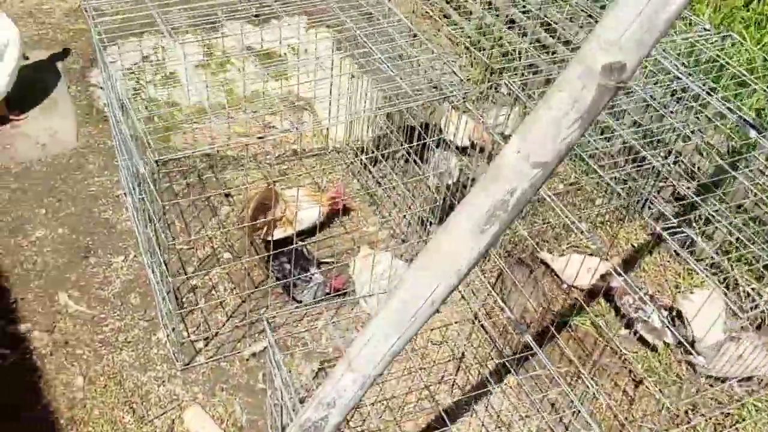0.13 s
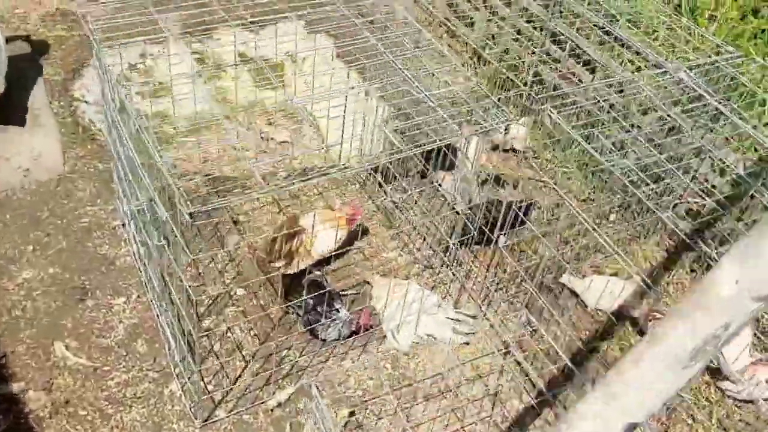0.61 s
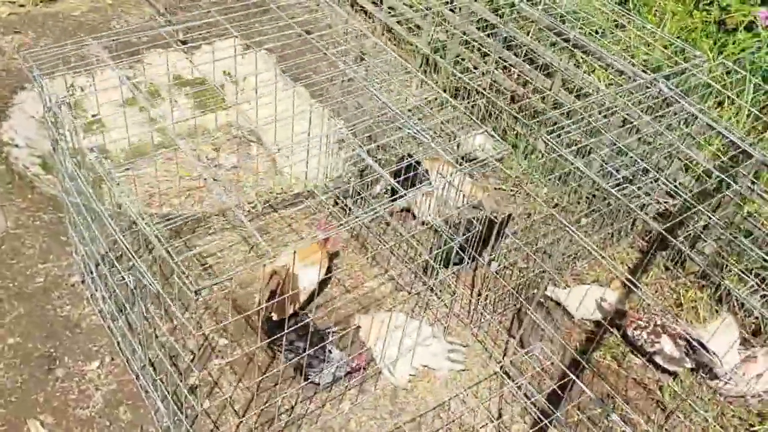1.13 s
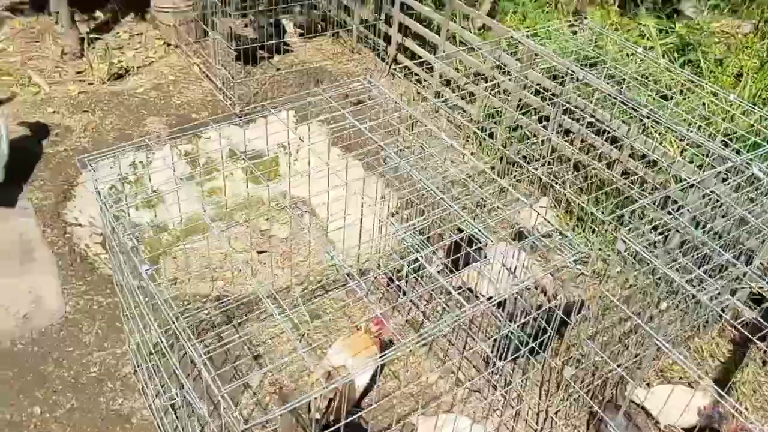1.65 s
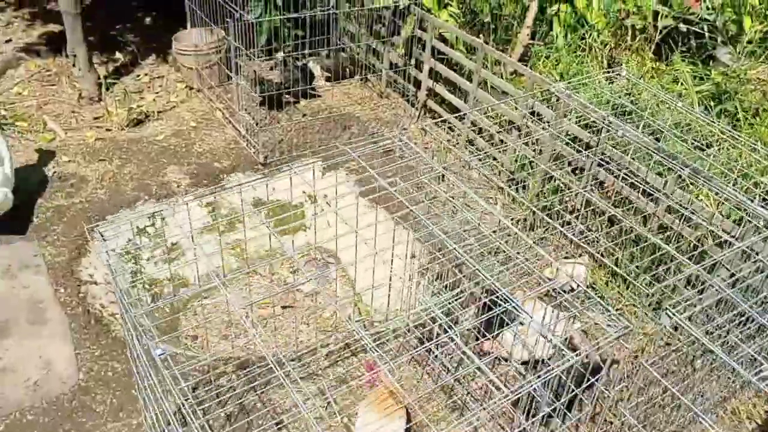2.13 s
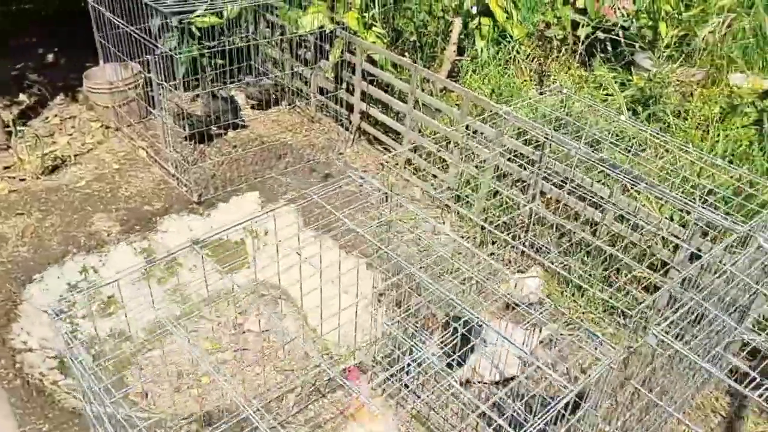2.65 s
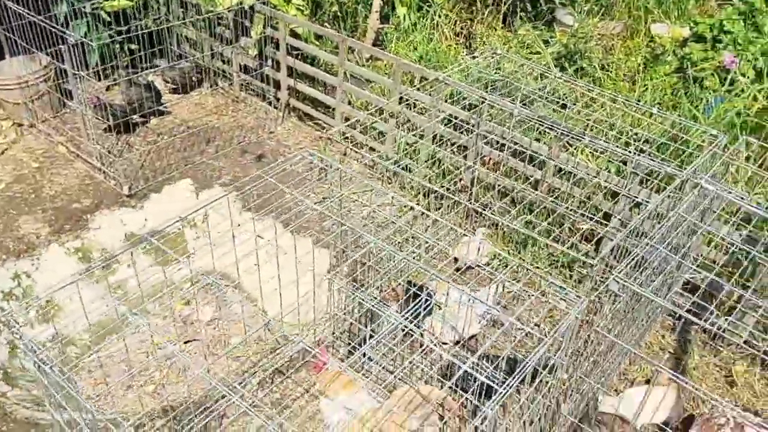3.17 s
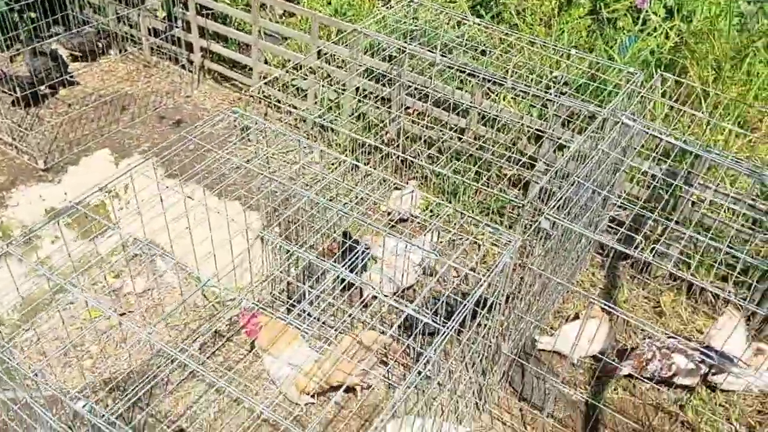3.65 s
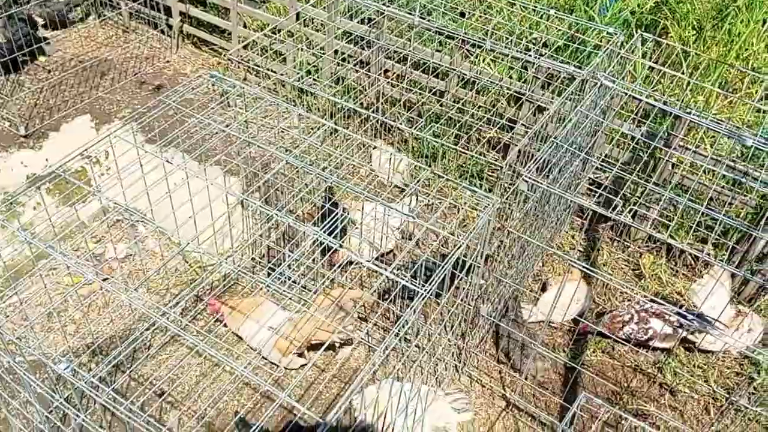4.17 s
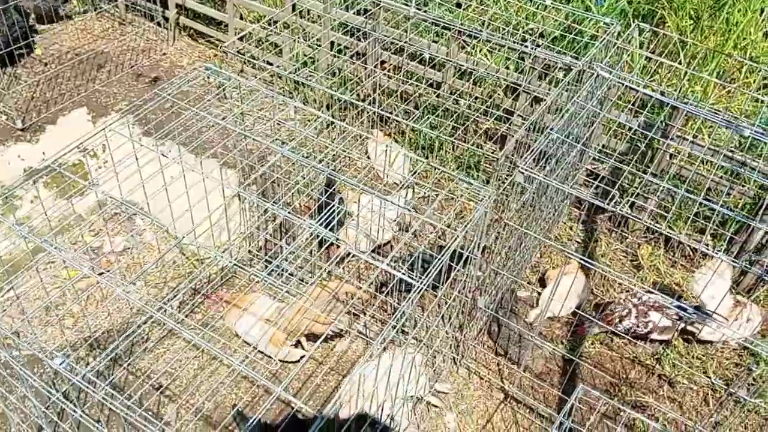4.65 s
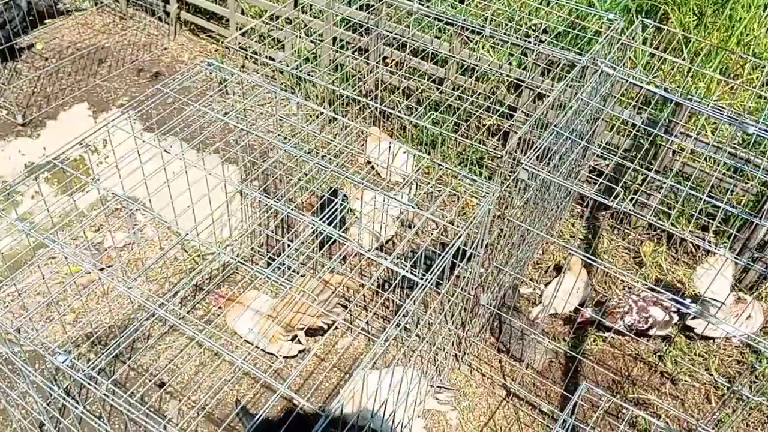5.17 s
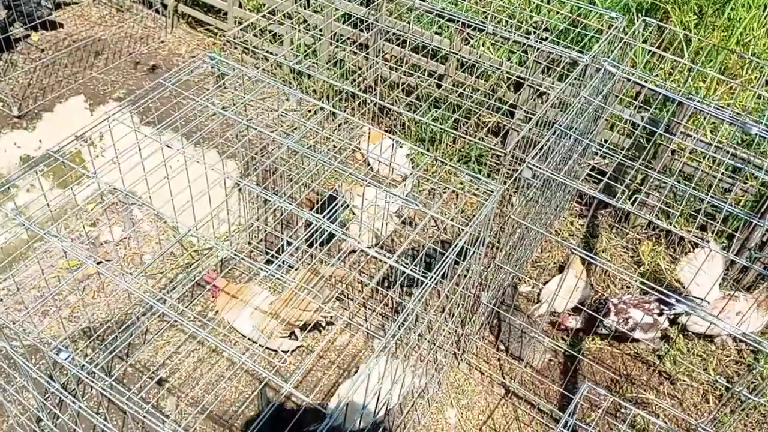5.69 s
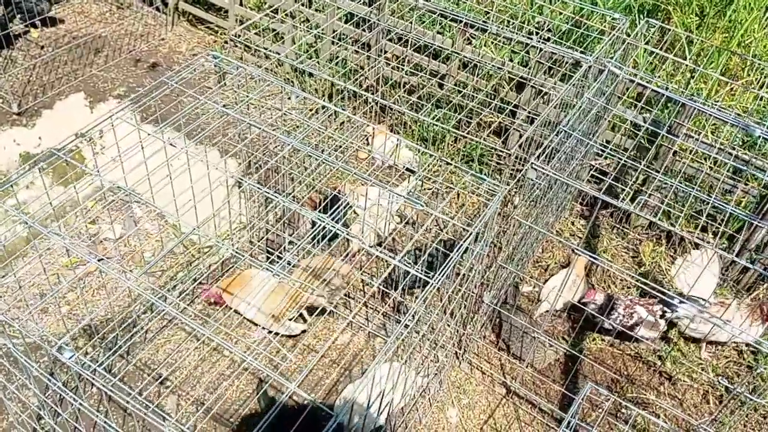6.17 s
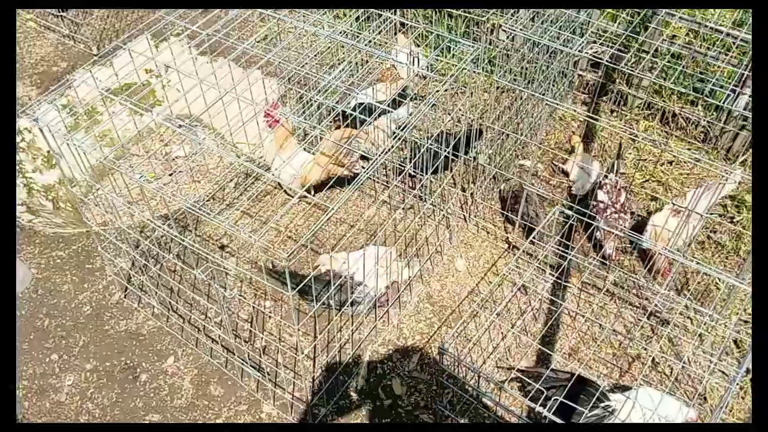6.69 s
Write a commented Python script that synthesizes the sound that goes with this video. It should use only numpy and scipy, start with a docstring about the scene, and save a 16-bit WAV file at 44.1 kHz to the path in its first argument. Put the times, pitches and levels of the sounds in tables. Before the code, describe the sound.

Loud raspy duck quacks repeat in a sunny farmyard, with small peeps and low engine drone behind, then cut off before background fades back.

```python
"""Traffic rumbles far off with droning engines; a near duck then gives a run of long hoarse quacks. Other ducks
put in mostly short ones, one long, and chicks peep. Noise of set spectrum makes road and wind, sinusoids make
engines and peeps, and uneven pulses with breath noise, shaped by resonances, make quacks. Two spaced microphone
ports of a phone hear it; near the end the sound is cut off and fades back in."""
import sys
import numpy as np
from scipy import signal
from scipy.fft import rfft, irfft, next_fast_len
from scipy.io import wavfile
from scipy.ndimage import uniform_filter1d, map_coordinates

SR = 44100
rng = np.random.default_rng(int(sys.argv[2]) if len(sys.argv) > 2 else 0)


def wav_out(sig):
    """Save sig, one row per channel (or a flat mono array), as 16-bit PCM at SR to the path in sys.argv[1]."""
    wavfile.write(sys.argv[1], SR, np.round(np.clip(np.atleast_2d(sig).T, -1, 1) * 32767).astype(np.int16))


def field_ratio(decibels):
    """Amplitude ratio for a level in dB (20 dB per decade); scalars and array-likes work."""
    return 10 ** (np.asarray(decibels, dtype=float) / 20)


N = 300762


def unit(x):
    """Normalisation: scales a signal to rms 1."""
    return x / np.sqrt(np.mean(x ** 2) + 1e-20)


def along(points, hz):
    """Logarithmic frequency scale: reads (f/Hz, value) points along it."""
    f, v = np.transpose(points)
    return np.interp(np.log(hz + 1), np.log(f + 1), v)


def curves(rows, t):
    """Linear interpolation in time: reads every column after the first at times t."""
    s, *cols = np.transpose(rows)
    return [np.interp(t, s, c) for c in cols]


def wobble(rate, n=N):
    """Band-limited fluctuation: a smooth random curve with rate knots a second."""
    return map_coordinates(rng.standard_normal(int(n * rate / SR) + 4), [np.arange(n) * rate / SR])


def filtered(x, response):
    """Linear filtering: multiplies the spectrum by a complex response of frequency."""
    n = x.shape[-1]
    m = next_fast_len(n + 8192)
    return irfft(rfft(x, m) * response(np.fft.rfftfreq(m, 1 / SR)), m)[..., :n]


def resonances(modes):
    """Modal superposition: second-order resonances (f/Hz, width/Hz, level/dB) of alternating sign."""
    return lambda f: sum((-1) ** k * field_ratio(db) * 1j * f * w / (c * c - f * f + 1j * f * w)
                         for k, (c, w, db) in enumerate(modes))


def rolloff(corner_hz, q):
    """Sixth-order low-pass: three equal second-order sections."""
    return lambda f: 1 / (1 + (1j * f / corner_hz) / q - (f / corner_hz) ** 2) ** 3


# correlation of the background between the ports: f/Hz, left-right likeness/1
ALIKE = [(60, 0.94), (300, 1), (700, 0.28), (1500, 0.88), (2500, 0.052), (6000, 0.12)]


def rush(spectrum, patchy_db):
    """Partly coherent noise: stereo of rms 1 with random gain patches in time and frequency."""
    z = signal.stft(rng.standard_normal((2, N)), nperseg=512)[2]
    field = uniform_filter1d(rng.standard_normal(z.shape[1:]), size=5, axis=0)
    field = uniform_filter1d(field, size=10, axis=1)
    pair = signal.istft(z * field_ratio(patchy_db * unit(field)), nperseg=512)[1][:, :N]

    def shaped(hz):
        # cos of twice this angle is the correlation of mid + side with mid - side
        turn = np.arccos(np.clip(along(ALIKE, hz), -1, 1)) / 2
        return field_ratio(along(spectrum, hz)) * [np.cos(turn), np.sin(turn)]

    mid, side = filtered(pair, shaped)
    return unit(np.array([mid + side, mid - side]))


# low drones that swell and glide, as of passing vehicles: t/s, length/s, first f/Hz, last f/Hz, level/dB
DRONE = [(-.1, 0.48, 96.7, 105, -29.5), (0.7, 0.81, 120.8, 117.5, -33.5), (1.557, 0.73, 104, 100.1, -29),
         (2.287, 0.74, 98.5, 94.8, -29), (1.888, 2.0, 193.6, 161.6, -34), (2.918, 0.83, 123.8, 110.5, -23),
         (5.75, 0.47, 129.3, 126.3, -26.5)]
# an engine that draws near and speeds up: t/s, f/Hz, level/dB
ENGINE = [(3.6, 77.74, -60), (3.9, 81.33, -31.5), (4.7, 86, -34), (5.4, 86.52, -34), (5.7, 86.7, -37),
          (5.95, 88.18, -29.5), (6.35, 88.4, -41), (6.5, 88.5, -43.5)]
# its orders: multiple of f/1, relative level/dB
ENGINE_ORDERS = [(1, -0.5), (2, -10.5), (3, -2), (4, -13.5)]
# harmonics of a small motor of steady pitch: multiple of HUM_HZ/1, relative level/dB
HUM = [(4, -52.5), (6, -56), (8, -52)]
# course of the hum, added to its harmonics: t/s, relative level/dB
HUM_LEVEL = [(0, 7), (.5, 3.5), (.8, -1), (1.4, 2), (1.7, 11), (2.1, 3), (4, 2.5), (6.3, -10.5), (6.6, 10)]
HUM_HZ = 87.2


def engines(t):
    """Periodic excitation: rotating machines radiate sinusoids at multiples of their rate."""
    out, waver = 0, 1 + .03 * wobble(20)
    for s, length, first_hz, last_hz, db in DRONE:
        u = np.clip((t - s) / length, 0, 1)
        hz = (first_hz + (last_hz - first_hz) * u) * waver
        swell = field_ratio(db + 1.3 * wobble(22)) * np.sin(np.pi * u)
        out = out + swell * np.sin(2 * np.pi * np.cumsum(hz) / SR)
    hz, db = curves(ENGINE, t)
    turn = 2 * np.pi * np.cumsum(hz * (1 + 0.014 * wobble(8))) / SR
    out = out + sum(field_ratio(db + g + 4.3 * wobble(7.3)) * np.sin(k * turn) for k, g in ENGINE_ORDERS)
    turn = 2 * np.pi * np.cumsum(HUM_HZ * (1 + 0.00595 * wobble(6))) / SR
    hum_db, = curves(HUM_LEVEL, t)
    return out + sum(field_ratio(g + hum_db + 2.2 * wobble(7.4)) * np.sin(k * turn) for k, g in HUM)


# spectral shapes of the noises: f/Hz, relative level per Hz/dB
RUMBLE = [(12, -68.5), (20, -35.5), (54, -18), (67, -6.5), (92, -0.5), (208, -5), (230, -12.5), (258, -10),
          (400, -23), (520, -44.5), (880, -120)]
ROAR = [(120, -23), (200, -5), (232, -3.5), (265, -4), (518, -7.5), (703, -9), (1310, -9.5), (3000, -25),
        (3900, -71.5), (6600, -120)]
HISS = [(1290, -29), (2200, -8.5), (3280, -12), (3680, -11), (5000, -17), (5530, -18.5), (6210, -19.5),
        (6640, -26.5), (6800, -28.5), (8100, -24.5), (13600, -30.5), (15000, -37.5), (16000, -37)]
# course of the traffic: t/s, level/dB
TRAFFIC = [(0, -36), (.65, -35), (1.9, -33), (2.9, -36), (3.6, -33.5), (4.1, -32.5), (5.1, -32),
           (5.75, -33.5), (6.05, -32.5), (6.35, -35), (6.5, -34.5), (6.82, -35.5)]
# course of the wind hiss: t/s, level/dB
WIND = [(0, -56.5), (.6, -50), (3, -50.5), (4.3, -46.5), (5.7, -46.5), (6.35, -46), (6.5, -55.5),
        (6.82, -56)]
RUMBLE_DB = 2  # over the traffic course
ROAR_AFTER_DB = -1.5  # the roar is weaker after the cut
SWISH_S, SWISH_RISE_S, SWISH_FALL_S, SWISH_DB = 1.85, .012, .035, -37  # a thin high swish
CUT_S, RETURN_S, FADE_S = 6.357, 6.467, .4


def yard():
    """Broadband turbulence and friction: traffic rumble and roar, wind hiss in the leaves, a swish, engines."""
    t = np.arange(N) / SR
    (road_db,), (hiss_db,) = curves(TRAFFIC, t), curves(WIND, t)
    rumble_db = road_db + RUMBLE_DB + 2.0 * wobble(4.9) + 0.3 * wobble(5.3)
    out = field_ratio(rumble_db) * rush(RUMBLE, patchy_db=0.72)
    roar_db = road_db + ROAR_AFTER_DB * (t > RETURN_S) + 0.7 * wobble(8.7)
    out += field_ratio(roar_db) * rush(ROAR, patchy_db=2.0)
    out += field_ratio(hiss_db + 0.61 * wobble(3.424)) * rush(HISS, patchy_db=1.5)
    swish = np.exp(-np.abs(t - SWISH_S) / np.where(t < SWISH_S, SWISH_RISE_S, SWISH_FALL_S))
    thin = [(8000, -29), (11000, -5), (14000, -18), (15300, 7), (16000, -39.5)]
    out += field_ratio(SWISH_DB) * swish * rush(thin, patchy_db=1.5)
    return out + engines(t)


# whistles: t/s, length/s, highest f/Hz, level/dB, left-right level/dB
# chick peeps that slide down
PEEPS = [(3.12, .03, 3560, -48, -9), (3.238, .055, 4350, -45, -8), (3.367, .045, 5100, -48, 2),
         (3.372, .055, 4480, -44, -8), (3.532, .055, 4760, -43, -5), (3.54, .05, 5360, -48, 6),
         (4.655, .055, 4650, -46, -3), (4.905, .045, 5150, -47, -3), (4.899, .055, 4650, -47, -3),
         (6.105, .07, 5300, -53, -5), (6.69, .04, 4080, -43, 4)]
# peeps that arch up and down
ARCHES = [(6.13, 0.066, 3220, -46, -4.5), (6.529, 0.052, 4070, -45, 5.5), (6.54, 0.028, 4450, -48, -11),
          (6.622, 0.051, 3050, -50.5, -1), (6.668, 0.046, 4580, -50, -11), (6.79, 0.036, 4700, -55, -12)]
# nearly level notes, of chicks and of far fowl
NOTES = [(3.226, 0.03, 5150, -42, -12), (3.474, 0.0253, 5160, -41.5, -20), (3.2, 0.23, 1296, -45.5, -12),
         (3.44, 0.18, 1031, -43, 2), (3.44, 0.13, 700, -39, 2), (6.52, 0.025, 1940, -54, 0),
         (6.63, 0.026, 6050, -69, 8), (6.8, .03, 3200, -51, 0)]
# (rise, fall as shares of the highest pitch, place of the top 0-1)
PEEP_BEND, ARCH_BEND, NOTE_BEND = (.03, .24, .15), (.3, .28, .4), (.012, .012, .2)


def chicks():
    """Frequency modulation: each whistle rises to a top and falls, with a faint second harmonic."""
    out = np.zeros((2, N + SR))
    kinds = ((PEEPS, PEEP_BEND), (ARCHES, ARCH_BEND), (NOTES, NOTE_BEND))
    whistles = [(*row, *bend) for rows, bend in kinds for row in rows]
    for s, length, top_hz, db, pan_db, rise, fall, top in whistles:
        u = np.linspace(0, 1, round(length * SR))
        rising = 1 - rise * np.abs(1 - u / top) ** 3
        falling = 1 - fall * np.abs((u - top) / (1 - top)) ** 1.2
        hz = top_hz * np.where(u < top, rising, falling)
        turn = 2 * np.pi * np.cumsum(hz * (1 + .008 * wobble(200, len(u)))) / SR
        swell = np.sin(np.pi * u ** .6) ** .7 * field_ratio(db + 4 * wobble(130, len(u)))
        whistle = swell * (np.sin(turn) + 0.015 * np.sin(2 * turn))
        start = round(s * SR)
        out[:, start:start + len(u)] += field_ratio([[pan_db / 2], [-pan_db / 2]]) * whistle
    return out[:, :N]


LONG_S = .15  # longer quacks count as long
LONG_DB, SHORT_DB = (-.5, -1.5), (-1, -4.5)  # (onset, last moment before the release) under the top
LONG_TOP, SHORT_TOP = .55, .25  # place of the top in the quack, 0-1
LONG_RELEASE_S, SHORT_RELEASE_S, RELEASE_DB = .036, .02, -22.5
ATTACK_S, SHORT_ATTACK_S, ATTACK_DB = .002, .002, -3


def effort(s, length, db):
    """Amplitude envelope as (t/s, level/dB): sudden attack, swell, sag, release; short ones peak early."""
    if length > LONG_S:
        (onset_db, late_db), top, attack_s, release_s = LONG_DB, LONG_TOP, ATTACK_S, LONG_RELEASE_S
    else:
        (onset_db, late_db), top, attack_s, release_s = SHORT_DB, SHORT_TOP, SHORT_ATTACK_S, SHORT_RELEASE_S
    return [(s, db + onset_db + ATTACK_DB), (s + attack_s, db + onset_db), (s + top * length, db),
            (s + length - release_s, db + late_db), (s + length, db + RELEASE_DB)]


def syrinx(cycles, weaker, hoarse):
    """Period doubling: pulses alternate strong and weak, and breath noise bursts once a cycle."""
    n = len(cycles)
    count = np.arange(.1, cycles[-1])
    chance = rng.standard_normal((len(count), 2))
    uneven = np.interp(count, cycles, hoarse)
    # the alternation comes and goes
    alternation = weaker * np.clip(1 + .25 * wobble(12, n), 0, 1.25)
    weak = np.floor(count) % 2 * np.interp(count, cycles, alternation)
    # weak pulses also come late
    at = np.interp(count + .1 * weak + .05 * uneven * chance[:, 0], cycles, np.arange(n))
    size = (1 - weak) * field_ratio(10 * uneven * chance[:, 1])
    # a windowed sinc sets each pulse between samples
    taps = np.floor(at)[:, None] + np.arange(-7, 9)
    gap = taps - at[:, None]
    shape = size[:, None] * np.sinc(gap) * np.cos(gap * np.pi / 16) ** 2
    pulses = np.bincount(np.clip(taps, 0, n - 1).astype(int).ravel(), shape.ravel(), n)
    # the membranes flutter, so random phases spread each pulse over some ms
    flutter = .75 * rng.standard_normal(60)
    pulses = filtered(np.roll(pulses, -150), lambda f: np.exp(
        1j * np.interp(f / 230, np.arange(60), flutter) - 2j * np.pi * f * 150 / SR))
    burst = np.exp(-1.5 * ((cycles - .1) % 1)) * (1 - 0.17 * weaker * (np.floor(cycles) % 2))
    breath = burst * rng.standard_normal(n)
    return np.sqrt(1 - hoarse) * unit(pulses) + np.sqrt(hoarse) * unit(breath), breath


# lower throat, which moves: multiple of the first resonance/1, width/Hz, level/dB
THROAT = [(.56, 220, -15), (.78, 170, -9), (1.0, 130, 1.5)]
# upper throat, which follows its mean: multiple of the first resonance/1, width/Hz, level/dB
UPPER = [(1.37, 148.5, -5), (1.65, 182.6, -6.5)]
# resonances of the bill that stay put: f/Hz, width/Hz, level/dB
BILL = [(3070, 385, -20), (4145, 520, -23.5), (4920, 240, -29), (5556, 300, -23), (6240, 120, -32.5),
        (7400, 120, -41.5), (7900, 270, -29.5)]
WANDER_DB = 1.8  # the bill never holds still


def vocal_tract(source, breath, shut_hz, wide_hz, opening_db, treble_db):
    """Source-filter principle: throat resonances that shift and fixed bill resonances colour the source."""
    n = len(source)
    u = np.linspace(0, 1, n)
    shut, wide = [filtered(source, resonances([(k * f, w, g) for k, w, g in THROAT]))
                  for f in (shut_hz, wide_hz)]
    mean_hz = (shut_hz + wide_hz) / 2
    upper = sum((-1) ** k * field_ratio(WANDER_DB * wobble(21.9, n))
                * filtered(source, resonances([(ratio * mean_hz, w, g)]))
                for k, (ratio, w, g) in enumerate(UPPER))
    throat = field_ratio(WANDER_DB / 2 * wobble(15, n)) * ((1 - u) * shut + u * wide) + field_ratio(opening_db) * upper
    throat = filtered(throat, rolloff(2450, 1.041))
    breathy = source + .15 * unit(breath)
    bill = sum(field_ratio(WANDER_DB * wobble(20, n)) * filtered(breathy, resonances([mode])) for mode in BILL)
    voice = throat + field_ratio(treble_db + WANDER_DB / 2 * wobble(9.6, n)) * bill
    return filtered(voice, rolloff(8700, .9))


# chest tones: multiple of the pitch/1, level over the voice/dB
CHEST = [(1, -14), (2, -22.5)]
# partials between, scaled by the alternation: multiple of the pitch/1, level over the voice/dB
HALFWAY = [(1.5, -23.5), (2.5, -29), (3.5, -12), (4.5, -21)]
HOARSE_LEAST, HOARSE_PER_WEAKER = .055, .18  # hoarseness 0-1 grows with the alternation
SPUTTER_DB = 1.7  # the airflow comes in uneven bursts


def quack(rows, breakup, pitch, shut_hz, wide_hz, opening_db, treble_db):
    """Self-sustained oscillation: the syrinx drives the vocal tract, with chest and subharmonic tones."""
    tail = 600  # samples over which the sound dies out
    t = rows[0][0] + np.arange(round((rows[-1][0] - rows[0][0]) * SR) + tail) / SR
    n, (weaker,), (db,) = len(t), curves(breakup, t), curves(rows, t)
    hz = uniform_filter1d(curves(pitch, t)[0], size=600)
    cycles = np.cumsum(hz * (1 + .008 * wobble(35, n) + .008 * wobble(110, n))) / SR
    source, breath = syrinx(cycles, weaker, HOARSE_LEAST + HOARSE_PER_WEAKER * weaker)
    voice = vocal_tract(source, breath, shut_hz, wide_hz, opening_db, treble_db)
    voice = voice * field_ratio(SPUTTER_DB * (.4 + weaker) * wobble(70, n))
    chest = sum(field_ratio(g + 3.1 * wobble(22, n)) * np.sin(2 * np.pi * k * cycles) for k, g in CHEST)
    halves = sum(field_ratio(g + 4.6 * wobble(25, n)) * np.sin(2 * np.pi * k * cycles) for k, g in HALFWAY)
    ending = np.clip((t[-1] - t) * SR / tail, 0, 1) ** 2
    return (unit(voice) + (1 - 0.37 * weaker) * chest + weaker * halves) * field_ratio(db) * ending


# quacks of other ducks, mostly short, one long: t/s, length/s, relative level/dB, pitch f/Hz, bill opening/dB
FLOCK = [(0.454, 0.029, -50, 227, 4.5), (0.863, 0.05, -36, 190, -26), (1.618, 0.047, -33, 260.5, -17.5),
         (1.901, 0.064, -35, 249.4, 5), (2.428, 0.031, -30.5, 195.8, -7), (2.577, 0.0795, -26, 222.3, -9),
         (2.833, 0.056, -37, 252, 1.5), (3.167, 0.062, -31, 228.7, -4), (4.072, 0.24, -26, 198.2, -10.5),
         (4.641, .045, -37, 245, -13), (4.74, .075, -33, 225.6, 8), (5.241, 0.068, -23, 205.9, -6.5),
         (5.364, 0.035, -24, 195.7, -7.5), (5.516, 0.066, -34.5, 263, 4), (5.831, 0.094, -21, 198.3, -8.5),
         (5.986, 0.05, -27, 203, -7.5)]
# long quacks of the near duck: t/s, length/s, relative level/dB
NEAR = [(0.559, 0.26, -22.5), (1.307, .26, -23), (2.097, 0.27, -24.5), (2.876, 0.26, -23.5),
        (3.642, 0.28, -25), (4.362, 0.238, -25.5), (4.954, .25, -25), (5.619, 0.22, -24),
        (6.248, 0.22, -24)]
# how the near duck holds its head: t/s, first throat resonance f/Hz,
# bill opening as level of the upper resonances/dB, treble level/dB
POSTURE = [(.6, 1307, -4, -1.5), (1.4, 1348, -4.5, -5), (2.2, 1431, -4, -4.5), (3, 1390, -9.5, -4),
           (3.8, 1362, -1, -6.5), (4.45, 1340, -1.5, 0), (5, 1394, -3, 1), (5.7, 1428, -4.5, 3.5),
           (6.3, 1405, -2.5, 4.5)]
# pitch of the near duck, moving within each quack: t/s, f/Hz
PITCH = [(0.559, 242.8), (.69, 261.2), (.735, 258.3), (.78, 233.1), (.81, 237), (1.306, 232.9), (1.46, 257),
         (1.52, 237), (1.565, 220.4), (2.098, 228.4), (2.13, 243.8), (2.25, 250.2), (2.37, 224),
         (2.877, 230.4), (2.94, 247.8), (3.039, 255.1), (3.133, 227.4), (3.642, 235.5), (3.71, 250),
         (3.819, 245), (3.91, 230.4), (4.361, 230), (4.418, 239.6), (4.53, 230), (4.59, 218.3),
         (4.957, 219.1), (5.045, 246.6), (5.071, 249), (5.14, 236.9), (5.207, 212.3), (5.619, 260.2),
         (5.686, 265.5), (5.75, 256.4), (5.83, 226), (6.246, 242.8), (6.299, 242.1), (6.461, 234)]
# its alternation: t/s, share by which every second pulse is weaker/1
BREAKUP = [(.6, .04), (.66, .45), (.8, .4), (1.3, .5), (1.42, .3), (1.56, .55), (2.1, .65), (3.13, .7),
           (3.64, .55), (3.9, .7), (4.36, .55), (4.6, .75), (4.96, .4), (5.1, .2), (5.2, .3), (5.62, .06),
           (5.75, .15), (5.83, .4), (6.25, .1), (6.3, .25), (6.36, .1)]
NEAR_WIDEN = .015  # throat climb either side of the mean, share
FLOCK_THROAT_HZ, THROAT_HZ_PER_DB = 1390, 16  # a wider bill lifts the throat
FLOCK_TREBLE_DB, TREBLE_PER_DB = -3.5, 0.61  # and brightens
FLOCK_RISE, FLOCK_SAG = .03, .05  # shares of the pitch
WEAKER_PER_S, WEAKER_MOST = 3.5, .5  # the longer a quack, the more it breaks up


def ducks():
    """Superposition: the quacks of the flock and of the near duck add at their moments."""
    out, calls = np.zeros(N + SR), []
    for s, length, db, hz, opening_db in FLOCK:
        throat_hz = FLOCK_THROAT_HZ + THROAT_HZ_PER_DB * opening_db
        breakup = [(s, min(WEAKER_PER_S * length, WEAKER_MOST))]
        pitch = [(s, hz * (1 - FLOCK_RISE)), (s + .03, hz),
                 (max(s + length - .04, s + .031), hz), (s + length, hz * (1 - FLOCK_SAG))]
        calls.append((effort(s, length, db), breakup, pitch, throat_hz, throat_hz,
                      opening_db, FLOCK_TREBLE_DB + TREBLE_PER_DB * opening_db))
    for s, length, db in NEAR:
        throat_hz, opening_db, treble_db = curves(POSTURE, s)
        pitch = [row for row in PITCH if s - .03 < row[0] < s + length + .03]
        calls.append((effort(s, length, db), BREAKUP, pitch, throat_hz * (1 - NEAR_WIDEN),
                      throat_hz * (1 + NEAR_WIDEN), opening_db, treble_db))
    for call in calls:
        sound = quack(*call)
        out[round(call[0][0][0] * SR):][:len(sound)] += sound
    return out[:N]


# decay of the tail: f/Hz, t60/s
WALLS = [(300, 0.067), (1500, 0.11), (6000, 0.032)]


def walls(x, early_db, late_db):
    """Reflection: ground and sheds send close echoes, different at each port, then a short tail."""
    hz, t, z = signal.stft(rng.standard_normal((2, SR // 2)), SR, nperseg=256)
    tail = signal.istft(z * field_ratio(-60 * t / along(WALLS, hz)[:, None]), SR, nperseg=256)[1]
    answer = field_ratio(late_db) * np.pad(tail / np.linalg.norm(tail[0]), ((0, 0), (500, 0)))
    for port in answer:
        port[rng.integers(30, 700, 8)] += field_ratio(early_db) * rng.standard_normal(8)
    return signal.fftconvolve(np.atleast_2d(x), answer, axes=1)[:, :N]


# colour of the two ports: f/Hz, left-right level/dB
PORTS = [(60, -1.2), (300, 0), (900, -1), (1400, 6.5), (2300, 5.5), (2800, 2), (3700, -10.5), (5000, -7),
         (6500, -5), (8300, -0.5), (15000, 4.5)]


def ports(pair, lag):
    """Interaural-type differences: each port has its own colour and its own phase lag."""
    side = np.array([[1], [-1]])  # left, right

    def response(hz):
        phase = np.interp(hz, *np.transpose(lag))
        return field_ratio(side * along(PORTS, hz) / 2) * np.exp(-.5j * side * phase)

    return filtered(pair, response)


# phase by which the left port lags: f/Hz, lag/rad
# for the yard
YARD_LAG = [(0, 0), (500, 1.06), (1300, -3.5), (2000, -5.5), (6000, -13)]
# for the ducks
DUCK_LAG = [(0, 0), (520, .2), (860, 1.4), (1200, 2.6), (1550, 3.1), (1900, 3.4), (2240, 6.2), (2600, 6.3),
            (2930, 8), (3300, 9), (3900, 16.5), (5500, 20), (8000, 30)]
# for the ducks once the phone has turned
TURNED_LAG = [(0, 0), (520, .2), (860, 1.7), (1200, 2.6), (1550, 3.4), (1900, 5.3), (2240, 6.2),
              (2600, 6.3), (2930, 8.9), (3300, 9.5), (3900, 16), (5000, 19), (5700, 21), (8000, 26.5)]
TURN_S = 2.75


def scene():
    """Direct and reflected sound: ducks from one side, the road from the other, each with its phase lag."""
    calls, peeps = field_ratio(3.5) * ducks(), chicks()
    heard = calls + walls(calls, early_db=-18, late_db=-12.5)
    before_turn = np.arange(N) < TURN_S * SR
    birds = np.where(before_turn, ports(heard, DUCK_LAG), ports(heard, TURNED_LAG))
    return birds + peeps + walls(peeps, early_db=-12, late_db=-6) + ports(yard(), YARD_LAG)


def top_cut(x):
    """Nothing passes above the cut-off."""
    return signal.sosfilt(signal.butter(12, 16780, fs=SR, output="sos"), x)


# treble loss of the ports: f/Hz, level/dB
MICROPHONE = [(7000, 0.5), (7700, -14.5), (8300, -20)]


def record(dry):
    """Transduction and saturation: treble is lost, peaks round off; the sound stops short and fades back in."""
    t = np.arange(N) / SR
    heard = filtered(dry, lambda hz: field_ratio(along(MICROPHONE, hz)))
    heard = heard / (1 + np.abs(heard / .62) ** 4) ** .25
    stopping = np.clip((CUT_S - t) / 0.0044, 0, 1)
    returning = np.clip((t - RETURN_S) / FADE_S, 0, 1) ** 0.88
    return top_cut(heard * np.maximum(stopping, returning))


dry = scene()
out = record(dry)
wav_out(out)
```